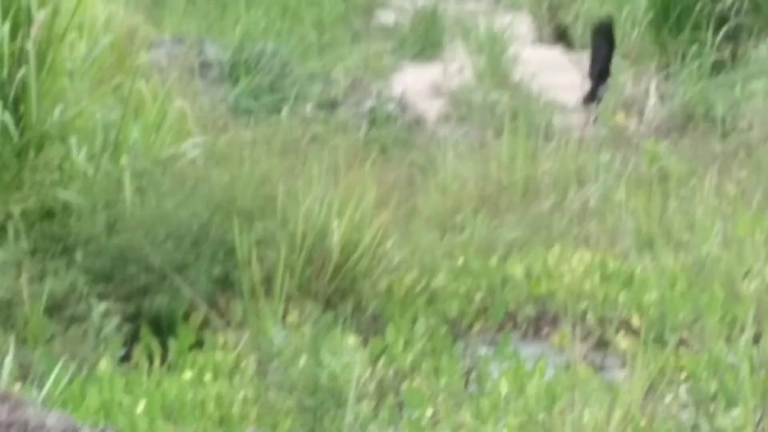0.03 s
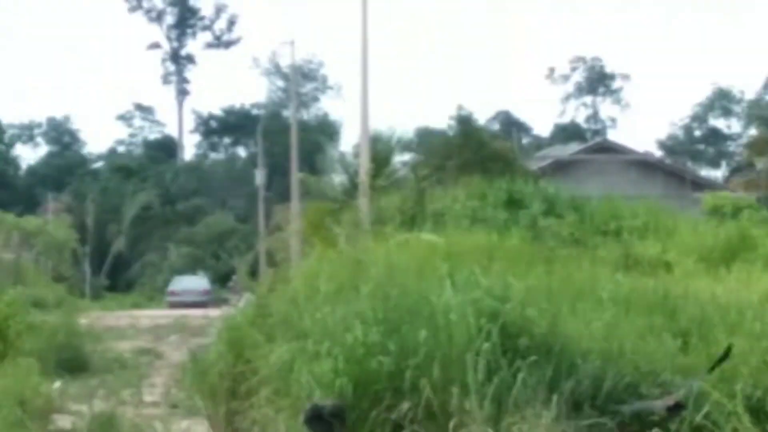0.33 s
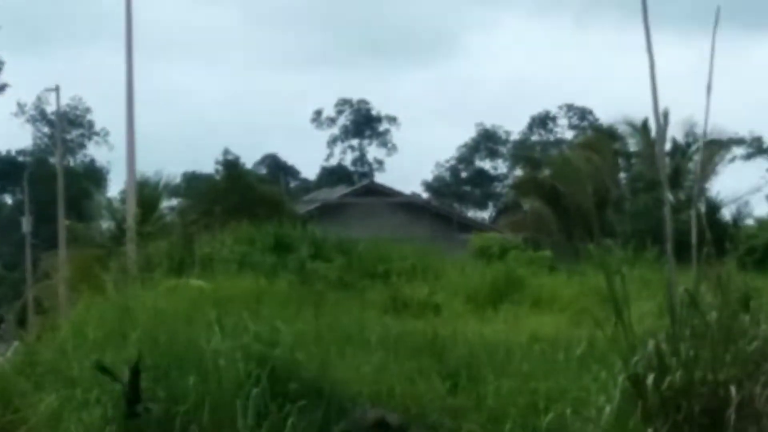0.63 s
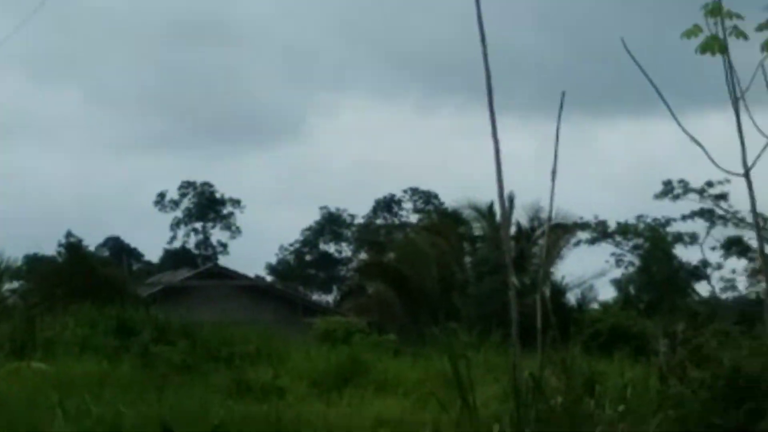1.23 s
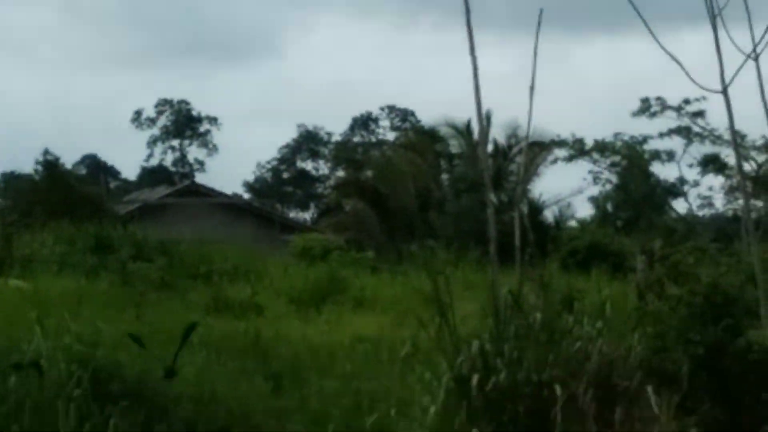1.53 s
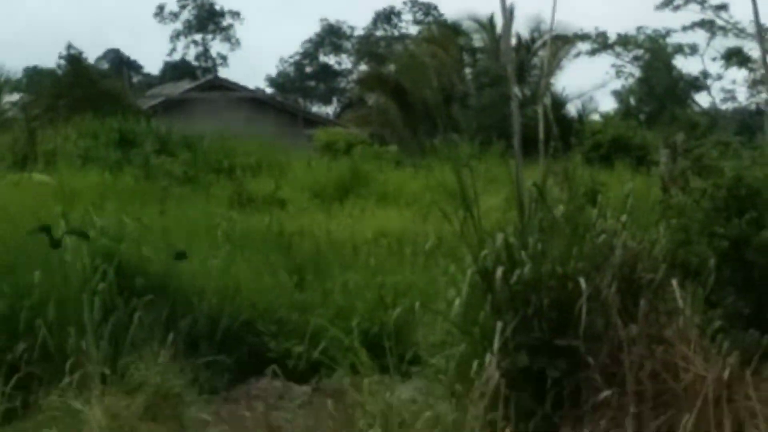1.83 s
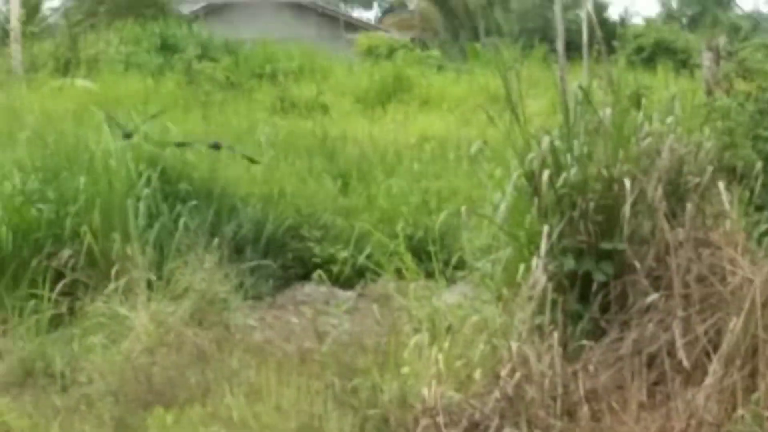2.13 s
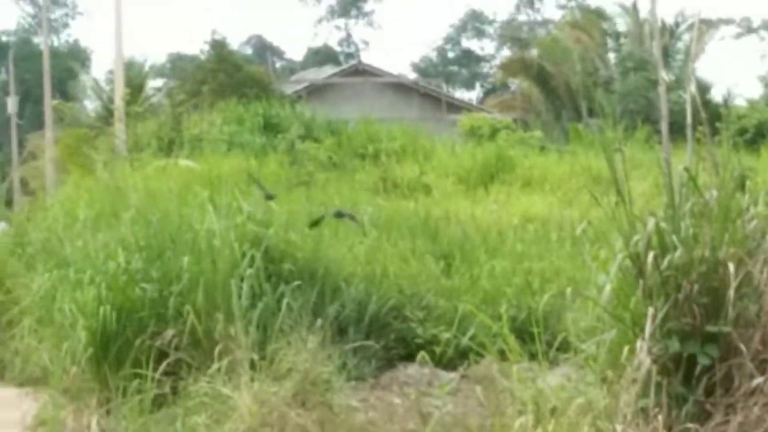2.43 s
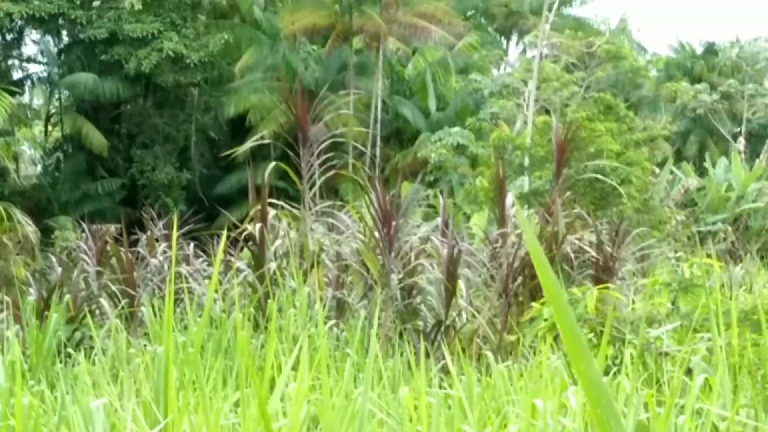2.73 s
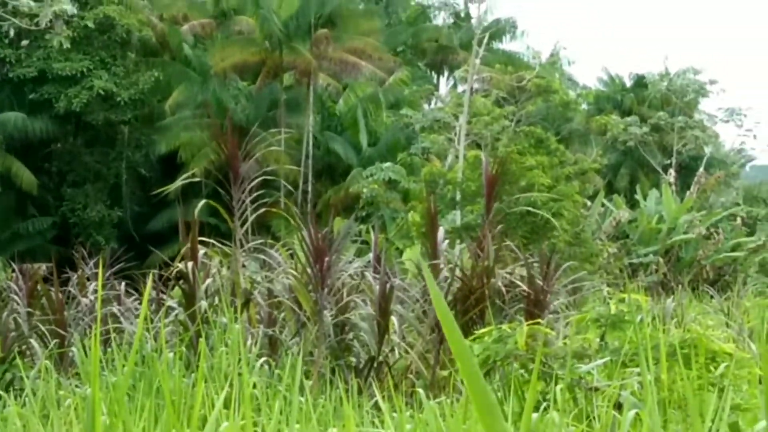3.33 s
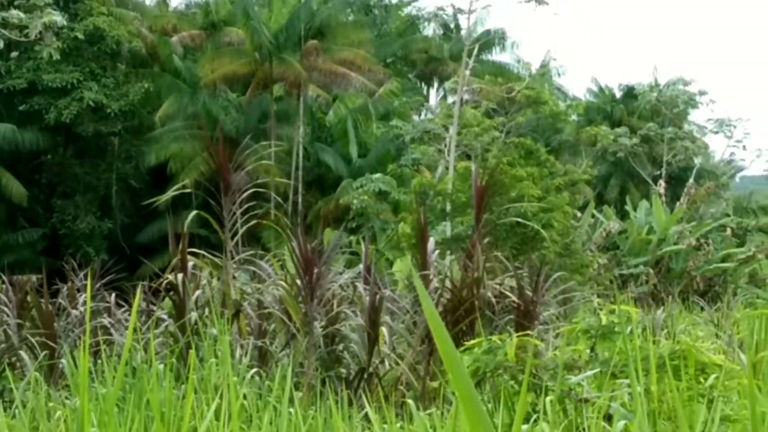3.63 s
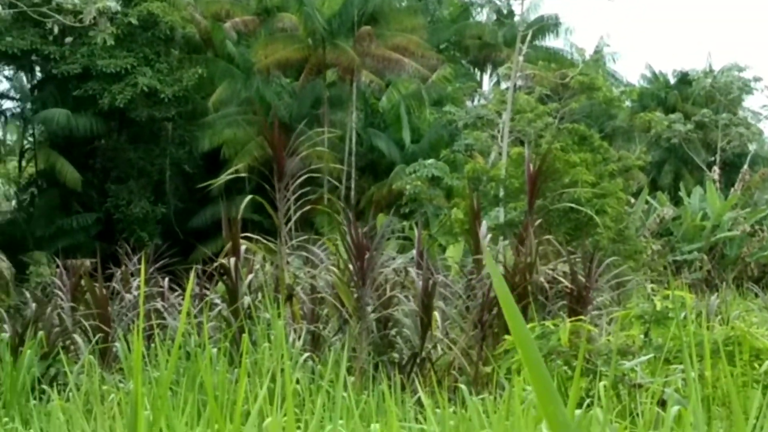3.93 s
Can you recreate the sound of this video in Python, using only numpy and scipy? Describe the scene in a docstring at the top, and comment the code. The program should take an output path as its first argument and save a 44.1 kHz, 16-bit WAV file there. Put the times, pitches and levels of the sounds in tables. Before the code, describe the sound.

Birds give short, harsh, rising calls at about 0.3, 1.1 and 2.5 seconds, the last weaker, each with a slight echo. Wind rumbles on the microphone over a faint distant engine hum. Soft handling bumps come just after 2 seconds. The sound cuts out at 2.6 and returns at 2.9 with a low thump and quick ticks. A light knock follows at 3.2, then very faint peeps under the wind.

```python
"""A grassy field, where birds take off with three harsh calls: each is a rising whistle that random
frequency modulation breaks into a rasp, scattered by the grass and echoed by trees. Turbulent wind
rumbles on the microphone, an engine hums far off, stalks and leaves rustle, a small bird peeps, and
bumps ring the camera's case. The sound cuts out briefly and fades back in with a thump and ticks."""
import sys
import numpy as np
from scipy import signal
from scipy.fft import rfft, irfft, next_fast_len
from scipy.io import wavfile
from scipy.ndimage import uniform_filter1d, map_coordinates

SR = 44100
rng = np.random.default_rng(int(sys.argv[2]) if len(sys.argv) > 2 else 0)


def to_wav(sig):
    """Store sig (one row per channel, or 1-D mono) as 16-bit WAV at the path in sys.argv[1].

    Samples outside -1..1 are clipped; the rate is SR.
    """
    pcm = np.clip(np.atleast_2d(sig), -1, 1) * 32767
    pcm = np.round(pcm).astype(np.int16)
    wavfile.write(sys.argv[1], SR, pcm.T)  # frames by channels


N = 176400


def amp(db):
    """Decibels to amplitude ratio."""
    return 10 ** (np.asarray(db) / 20)


def clock():
    """Time of each sample in seconds."""
    return np.arange(N) / SR


def along(points, hz):
    """Interpolate (frequency, value) points on a logarithmic frequency axis."""
    f, v = np.transpose(points)
    return np.interp(np.log(hz + 1), np.log(f + 1), v)


def curves(rows):
    """Piecewise linear envelopes, one for each column after the time."""
    times, *columns = np.transpose(rows)
    return [np.interp(clock(), times, column) for column in columns]


def wobble(rate):
    """Slow random modulation: a spline through rate knots a second."""
    return map_coordinates(rng.standard_normal(N // 8), [clock() * rate], mode="mirror", order=3)


def filtered(x, response):
    """Linear filtering: the spectrum is multiplied by a frequency response."""
    size = next_fast_len(N + SR // 4)
    return irfft(rfft(x, size) * response(np.fft.rfftfreq(size, 1 / SR)), size)[..., :N]


def coloured(x, points):
    """Spectral shaping by a (frequency [Hz], gain [dB]) curve."""
    return filtered(x, lambda hz: amp(along(points, hz)))


def phase_of(hz):
    """Phase is the time integral of frequency."""
    return 2 * np.pi * np.cumsum(hz) / SR


def pan(db):
    """A level difference, left over right, sets the direction."""
    return amp(np.array([[db], [-db]]) / 2)


def noise(spectrum):
    """Partly coherent stereo noise of a given spectrum; its mid signal has rms 1."""
    # (frequency [Hz], left-right correlation [0-1])
    coherence = [(30, 0.25), (100, .5), (300, 0.65), (700, .35), (2000, 0.087), (10000, .05)]

    def response(hz):
        angle = np.arccos(along(coherence, hz)) / 2
        return amp(along(spectrum, hz)) * [np.cos(angle), np.sin(angle)]

    mid, side = filtered(rng.standard_normal((2, N)), response)
    return np.array([mid + side, mid - side]) / mid.std()


def patchy(x, depth_db):
    """Random modulation in time and frequency makes narrow bands swell and sink."""
    bands = signal.stft(x, nperseg=1024)[2]
    swell = uniform_filter1d(rng.standard_normal(bands.shape[1:]), size=3, axis=0)
    swell = uniform_filter1d(swell, size=8, axis=1)
    swell /= np.sqrt(np.mean(swell ** 2))
    return signal.istft(bands * amp(depth_db * swell), nperseg=1024)[1][:, :N]


def wind():
    """Turbulence buffets each side of the microphone separately, over a breeze in the field."""
    # two stretches of gusts: (time [s], rumble level [dB], breeze level [dB])
    gusts = [
        [(0.0, -52, -68), (0.02, -55.5, -68), (0.71, -50.5, -69), (0.76, -51, -71), (1.0, -57, -70.5),
         (1.31, -55, -64), (2.0, -59.5, -70), (2.1, -63.5, -70.5), (2.16, -60, -67.5), (2.21, -59, -71.5),
         (2.48, -51.5, -67.5), (2.54, -53, -69)],
        [(3.1, -68, -68.5), (3.162, -54.5, -68.5), (3.206, -60, -66), (3.224, -58.5, -71.5),
         (3.384, -51.5, -69), (3.42, -54, -72), (3.502, -53.5, -67.5), (3.574, -57.5, -68),
         (3.678, -51.5, -68.5), (3.712, -54.5, -68.5), (3.942, -54.5, -69.5), (3.98, -81, -65.5)],
    ]
    # pressure spectra: (frequency [Hz], density [dB])
    rumble_spectrum = [(2, 11), (8, 5), (22, 3.5), (35, 10), (60, -5), (80, -4), (130, -17), (200, -24),
                       (400, -68.5)]
    breeze_spectrum = [(60, -9.5), (150, -2), (220, -2.5), (305, 0.5), (400, -7.5), (550, -11),
                       (750, -16.5), (1000, -22), (1400, -36), (2500, -37), (6000, -57)]
    rumble_db, breeze_db = curves(np.concatenate(gusts))
    buffet_db = 2 * np.array([wobble(12), wobble(9.5)])
    rumble = amp(rumble_db + 2 + buffet_db) * noise(rumble_spectrum)
    sway_db = 1.5 * wobble(14)
    breeze = amp(breeze_db + 0.99 + sway_db) * patchy(noise(breeze_spectrum), depth_db=2)
    return pan(-0.38) * rumble + breeze


def air():
    """Still air and far insects add incoherently to a faint hiss."""
    # hiss spectrum: (frequency [Hz], density [dB])
    spectrum = [(300, 8.5), (1500, -2), (2400, -3), (3300, -3.5), (4600, -3.5), (6200, -5.5), (7400, -3),
                (8200, -10), (11000, -11.5), (15500, -9)]
    # hiss envelope: (time [s], level [dB])
    levels = [(0, -85), (.8, -87), (1.5, -90), (2.3, -87.5), (3.2, -87), (4, -85.5)]
    level_db, = curves(levels)
    return amp(level_db) * patchy(noise(spectrum), depth_db=1.5)


def hum(rows, waver_db=2.5, spread_rad=0.55):
    """Two harmonics of an unsteady fundamental drift in level and phase on each side."""
    hz, fundamental_db, octave_db = curves(rows)
    phase = phase_of(hz * (1 + 0.012 * wobble(14)))
    drift = lambda: np.array([wobble(8), wobble(8.9)])
    tone = sum(amp(db + waver_db * drift()) * np.sin(k * phase + spread_rad * drift())
               for k, db in [(1, fundamental_db), (2, octave_db)])
    return np.sqrt(2) * tone * pan(-2.4)


def engine_and_drone():
    """A far engine's firing rate sets its fundamental; a second low drone sounds beside it."""
    # both hums: (time [s], fundamental [Hz], fundamental level [dB], octave level [dB])
    engine = [(0, 48.4, -66.5, -63.5), (.5, 47.69, -60.5, -62.5), (1, 48.36, -54.5, -63.5),
              (1.5, 48.91, -54.5, -66.5), (2, 49.59, -53.5, -68), (2.55, 51.12, -57, -65),
              (2.9, 50.6, -89, -95)]
    drone = [(0, 62, -82, -84), (.7, 61, -66, -76), (1.3, 60.5, -62, -76.5), (2.5, 63.5, -58, -80.5),
             (3.1, 59.5, -72.5, -67), (4, 59.3, -71.5, -63.5)]
    return hum(engine) + hum(drone)


def far_birds():
    """Nearly pure tones under arched envelopes: faint rising chirps, and peeps on one wavering note."""
    # chirps: (time [s], duration [s], level [dB], pitch [Hz], rise [Hz])
    chirps = [(0.0, 0.17, -93, 4820, 30), (0.439, .16, -96, 4820, 20), (1.32, .05, -93, 5246, 61.7),
              (1.56, 0.048, -97, 7460, 50), (3.289, .09, -88.5, 4820, 300), (3.317, 0.025, -89, 7640, 50)]
    # a small bird's peeps: (time [s], duration [s], level [dB], pitch [Hz])
    peeps = [(3.187, 0.035, -81.5, 4080), (3.53, 0.032, -83, 4060), (3.757, 0.042, -85, 4080)]
    t, out = clock(), np.zeros((2, N))

    def note(start, length, hz, waver_hz, rise_hz=0):
        progress = np.clip((t - start) / length, 0, 1)
        arch = np.sqrt(np.abs(np.sin(np.pi * progress)))
        return arch * np.sin(phase_of(hz + rise_hz * progress + waver_hz))

    for start, length, db, hz, rise_hz in chirps:
        out += amp(db) * note(start, length, hz, 110 * wobble(500), rise_hz)
    for start, length, db, hz in peeps:
        out += pan(-7) * amp(db + 2.5) * note(start, length, hz, 90 * wobble(300))
    return out


def stalks():
    """Friction between dry stalks gives brief bursts of noise."""
    # rustles: (time [s], level [dB], half-width [s])
    rustles = [(.08, -84.5, 0.0084), (0.795, -90, .01), (1.897, -88, 0.0086), (2.245, -83, 0.013),
               (2.272, -94, .008)]
    # rustle spectrum: (frequency [Hz], density [dB])
    spectrum = [(1000, -12), (2800, -10), (4300, 5), (5500, -10), (9000, -22), (15000, -20)]
    envelope = sum(amp(db) * np.exp(-((clock() - s) / width) ** 2) for s, db, width in rustles)
    return envelope * noise(spectrum)


def harsh_calls():
    """A whistle sweeps up; frequency and amplitude modulation spread it into a rasp of sidebands."""
    # envelope of each call: (time [s], voice level [dB], rasp level [dB])
    call_levels = [
        [(0.27, -81, -98), (0.282, -57.5, -80), (0.304, -50, -74.5), (0.344, -64.5, -77), (0.38, -67, -76.5),
         (0.4, -96, -99.5), (0.428, -73.5, -82.5), (0.445, -94, -98)],
        [(1.042, -86, -90.5), (1.05, -58, -90), (1.068, -47.5, -76), (1.076, -54, -79), (1.112, -63.5, -79.5),
         (1.13, -62.5, -73.5), (1.144, -84.5, -86), (1.172, -69.5, -80), (1.19, -94, -92)],
        [(2.476, -91, -97.5), (2.49, -66.5, -91), (2.516, -64.5, -80), (2.522, -78, -86),
         (2.562, -84.5, -104.5)],
    ]
    # contour of each call: (time [s], pitch [Hz], roughness [ratio])
    call_pitches = [
        [(.272, 4300, 0.19), (.281, 4790, 0.13), (.292, 4810, 0.09), (.303, 5240, 0.3), (.312, 5530, .8),
         (.328, 5680, 1.06), (.35, 5100, 0.76), (.425, 4940, 0.67)],
        [(1.047, 3930, 0.07), (1.053, 4194, 0.18), (1.058, 4670, 0.16), (1.067, 5070, .12), (1.08, 5300, .55),
         (1.094, 5550, 1.02), (1.12, 5380, 0.9), (1.17, 5290, .9)],
        [(2.47, 3870, .05), (2.482, 4210, 0.19), (2.487, 4720, 0.15), (2.497, 4920, 0.23), (2.51, 5210, .7),
         (2.55, 5540, 0.35)],
    ]
    # resonances that colour the voice and its overtones: (frequency [Hz], gain [dB])
    voice_colour = [(3000, -16), (3800, -6), (4170, 1), (4470, -9), (4740, 3), (5030, -2), (5250, 3),
                    (5550, -11), (5880, 2), (6200, 1), (6500, -13), (8000, -20)]
    overtone_colour = [(6400, -3.5), (7250, 12), (7700, -3), (8200, 6.5), (8900, -9.5), (9600, -5),
                       (10500, 2), (11500, -13.5)]
    # broadband rasp: (frequency [Hz], density [dB])
    rasp_spectrum = [(600, -23.5), (1400, -1.5), (2500, 3.5), (3500, -0.5), (5000, 7), (7300, -1.5),
                     (8800, -10), (10500, -8.5), (12500, -15.5), (15500, -18.5)]
    scatter_hz, flutter_hz, flutter_depth = 641, 310, 0.45
    t, rasp_envelope = clock(), np.zeros(N)
    voice, overtones = np.zeros((2, 2, N))
    for levels, pitches in zip(call_levels, call_pitches):
        voice_db, rasp_db = curves(levels)
        hz, roughness = curves(pitches)
        sounding = (t > levels[0][0]) & (t < levels[-1][0])
        # saturation makes the pitch jump between two limits, differently on each side
        jumps = [np.tanh(1.6 * wobble(1000)) for side in range(2)]
        phase = np.array([phase_of(hz + sounding * scatter_hz * roughness * jump) for jump in jumps])
        tremor = np.sin(phase_of(flutter_hz * (1 + 0.17 * wobble(90))))
        flutter = sounding * (1 + flutter_depth * roughness * tremor)
        strength = np.sqrt(2) * amp(voice_db + 1.5) * flutter
        voice += strength * np.sin(phase)
        octave = amp(-24 - 4.5 * roughness) * np.sin(2 * phase)
        fifth = amp(-30) * (1 - roughness) * np.sin(1.5 * phase)  # heard while the whistle is clean
        overtones += strength * (octave + fifth)
        rasp_envelope += amp(rasp_db + 5) * flutter
    return (pan(6.5) * coloured(voice, voice_colour)
            + pan(-7.5) * coloured(overtones, overtone_colour)
            + pan(1.5) * rasp_envelope * noise(rasp_spectrum))


def echo(x, t60_s):
    """Diffuse reflection: convolution with exponentially decaying noise, different on each side."""
    tail = rng.standard_normal((2, SR)) * amp(-60 * clock()[:SR] / t60_s)
    return signal.fftconvolve(x, tail / np.linalg.norm(tail[0]), axes=1)[:, :N]


def grass_and_trees(x):
    """Scattering from near grass dies quickly; far trees return a long, coloured echo."""
    # response of the trees: (frequency [Hz], gain [dB])
    tree_colour = [(3500, -5.5), (4500, -10), (4820, 2), (5080, -2.5), (5280, -3), (5700, -10), (8000, -13)]
    return amp(-9.5) * echo(x, t60_s=0.03) + amp(-25) * coloured(echo(x, t60_s=0.94), tree_colour)


def leaves(peak_s=1.45, half_width_s=0.47):
    """Many leaves rubbing in the breeze merge into one swish of noise."""
    # swish spectrum: (frequency [Hz], density [dB])
    spectrum = [(1200, -11), (1900, -4.5), (2350, 1.5), (2900, -11.5), (5000, -14.5)]
    return amp(-94.5) * np.exp(-((clock() - peak_s) / half_width_s) ** 2) * noise(spectrum)


def bumps(crack_cutoff_hz=2410, crack_t60_s=0.025):
    """Each impact excites the damped modes of the camera's case, with a dull crack of noise."""
    # impacts: (time [s], level [dB], left over right [dB])
    impacts = [(1.288, -73, 5), (2.094, -63, -2), (2.191, -58, 6), (2.336, -65, 11.5), (3.199, -51, 16.5)]
    # modes of the case: (frequency [Hz], level [dB], time to fall 60 dB [s])
    modes = [(415, -6.5, 0.06), (564, 0, 0.043), (830, -3, 0.016), (1310, -14, 0.014), (2396, -28.5, .02)]
    out = np.zeros((2, N))
    for start, db, pan_db in impacts:
        age = np.maximum(clock() - start, 0)
        ring = sum(amp(level - 60 * age / t60) * np.sin(2 * np.pi * hz * age) for hz, level, t60 in modes)
        dull = filtered(rng.standard_normal(N), lambda hz: 1 / (1 + (hz / crack_cutoff_hz) ** 2))
        crack = (age > 0) * amp(-5.5 - 60 * age / crack_t60_s) * dull
        out += pan(pan_db) * amp(db - 5.5) * (ring + crack)
    return out


def scene():
    """Superposition of all sources; only the birds are reflected."""
    background = wind() + air() + engine_and_drone()
    birds = far_birds() + harsh_calls()
    return background + birds + grass_and_trees(birds) + stalks() + leaves() + bumps()


def record(dry):
    """A gate cuts the sound with a tick; it fades back under a thump and a dying pulse train."""
    cut_s, cut_fade_s, resume_s, fade_in_s = 2.573, 0.00157, 2.9245, 0.082
    tick_gap_s, tick_decay_s, tick_fall_db_per_s = 0.01, 0.0042, 119
    thump_rise_s, thump_fall_s, band_limit_hz = 0.018, 0.15, 15700
    t = clock()
    gate = np.clip((cut_s - t) / cut_fade_s, 0, 1) + np.clip((t - resume_s) / fade_in_s, 0, 1)
    cut_tick = (t > cut_s) * amp(-71) * np.exp(-np.abs(t - cut_s) / tick_decay_s)
    since = np.maximum(t - resume_s, 0)
    tick_age = np.abs(since + 0.0005 * wobble(100)) % tick_gap_s  # slightly uneven spacing
    ticks = (t > resume_s) * amp(-50 - tick_fall_db_per_s * since) * np.exp(-tick_age / tick_decay_s)
    thump = amp(-35) * (1 - np.exp(-since / thump_rise_s)) * np.exp(-since / thump_fall_s)
    mix = dry * gate + cut_tick - ticks + thump
    return filtered(mix, lambda hz: 1 / np.sqrt(1 + (hz / band_limit_hz) ** 160))  # steep low-pass


dry = scene()
out = record(dry)
to_wav(out)
```